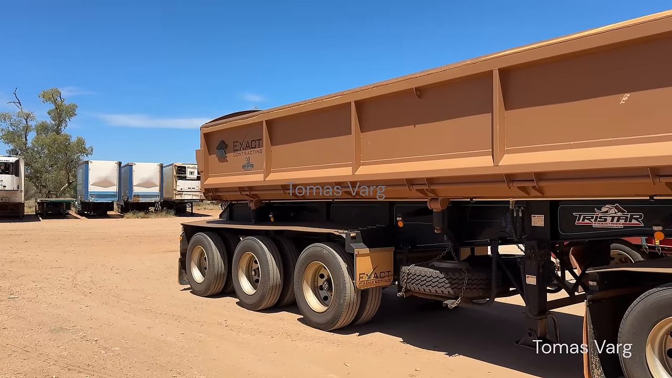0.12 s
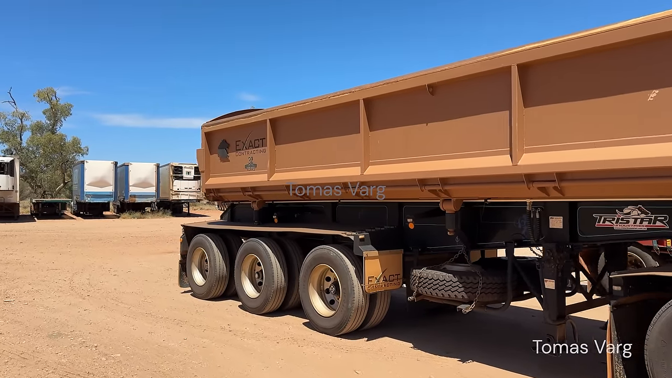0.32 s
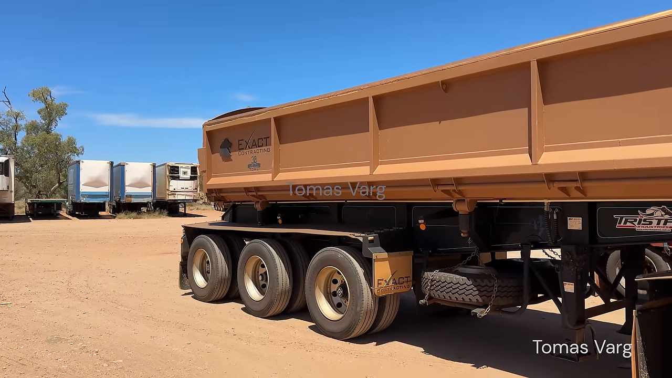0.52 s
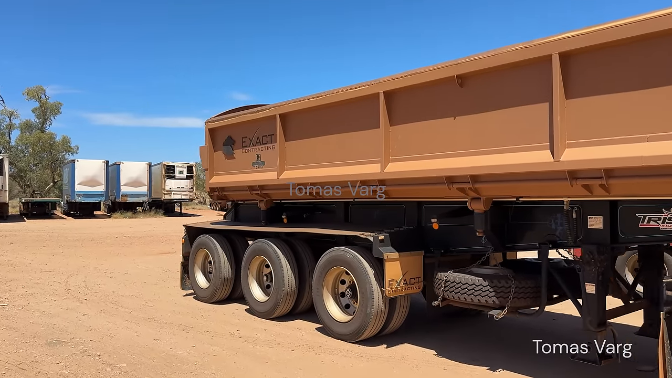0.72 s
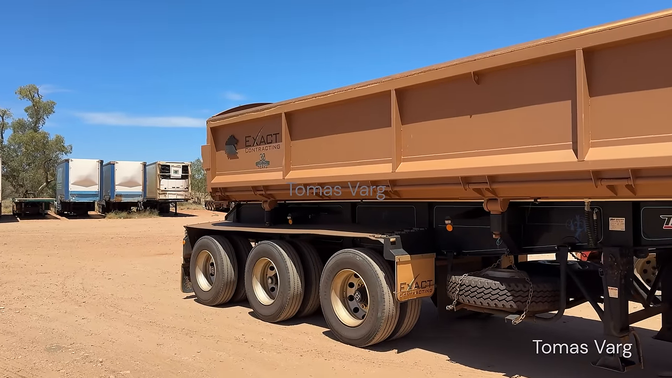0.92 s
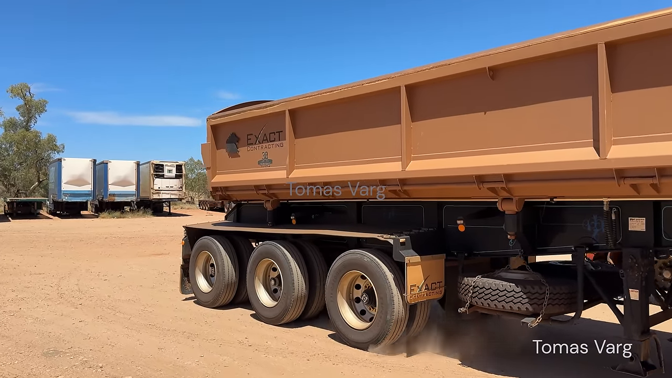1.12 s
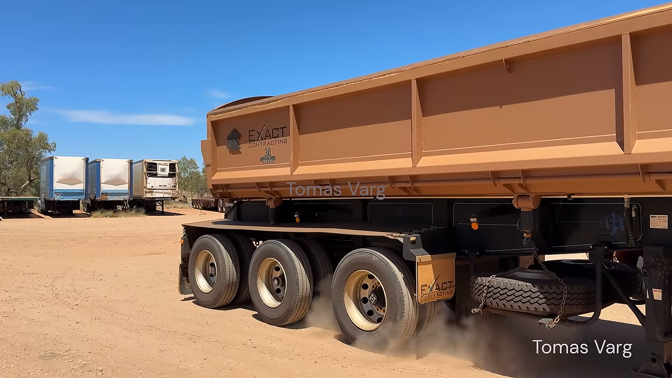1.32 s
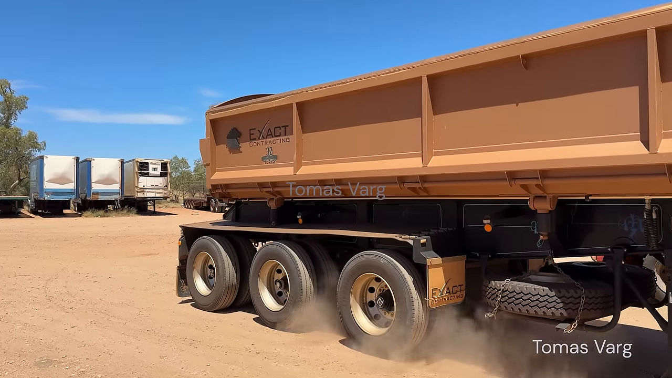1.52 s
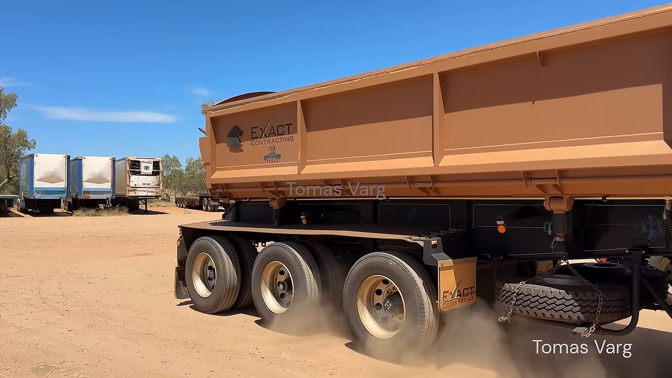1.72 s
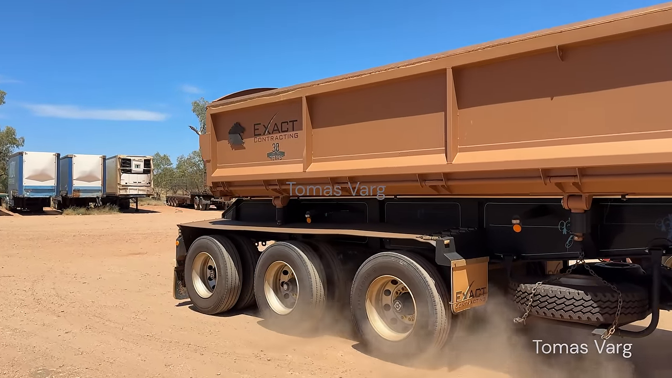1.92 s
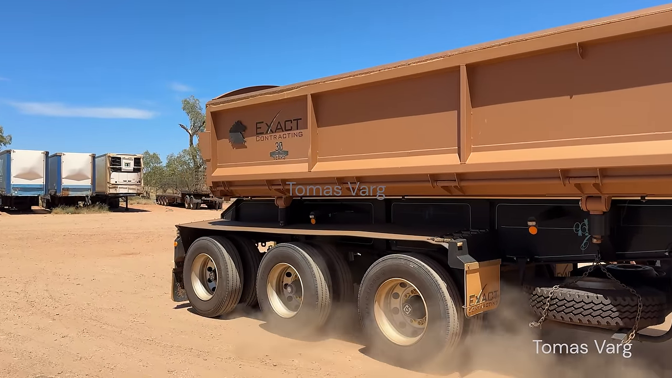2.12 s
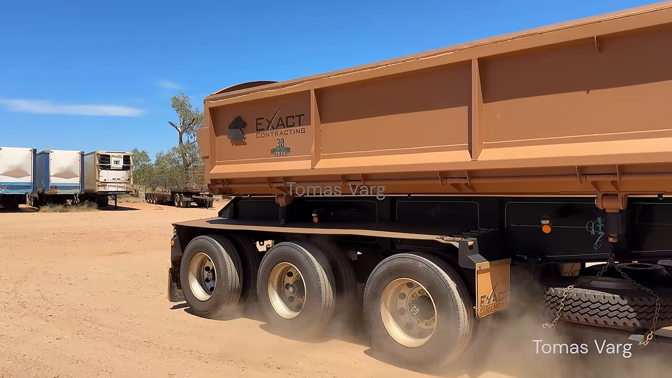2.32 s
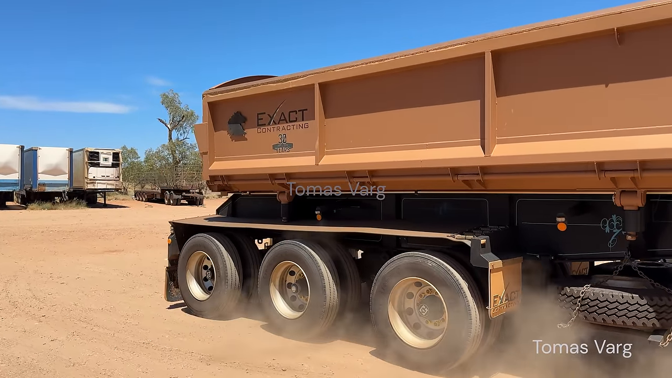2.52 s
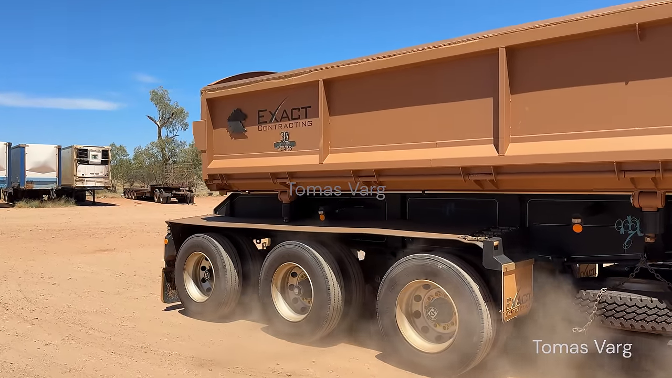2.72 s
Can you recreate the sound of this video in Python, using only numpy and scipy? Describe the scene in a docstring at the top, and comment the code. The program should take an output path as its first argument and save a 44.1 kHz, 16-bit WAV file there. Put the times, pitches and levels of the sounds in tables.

```python
"""Trailer brake-air dump

A heavy trailer in an open dirt yard dumps its brake air: filtered noise jets open in turn, dull behind wheels,
bright in plain view, sag with the pressure and snap shut. Decaying resonances jolt the chassis.
A diesel idles further off as pulses ringing its exhaust, over a yard hum of shaped noise.
Two close microphone ports hear the shared part of hiss and hum mostly late on the left."""
import sys
import numpy as np
from scipy import signal
from scipy.fft import rfft, irfft, next_fast_len
from scipy.io import wavfile
from scipy.ndimage import uniform_filter1d

SR = 44100
rng = np.random.default_rng(int(sys.argv[2]) if len(sys.argv) > 2 else 0)


def to_wav(s):
    """Save 16-bit WAV."""
    ch = np.atleast_2d(s).T  # columns
    pcm = np.round(np.clip(ch, -1, 1) * 32767)  # PCM
    wavfile.write(sys.argv[1], SR, pcm.astype(np.int16))


N = 121275

# yard hum spectrum: (frequency [Hz], relative density [dB per Hz])
HUM_SPECTRUM = [(30, -19), (90, 6), (140, -6.5), (190, -15), (700, -20), (1200, -22), (2000, -40),
                (6000, -46.5), (10000, -68), (16000, -79)]
# yard hum level: (time [s], level [dB])
HUM_LEVEL = [(0, -40), (.15, -38.5), (.3, -44), (2.5, -49.5), (2.75, -51)]

# idling engine level: (time [s], level [dB])
ENGINE_LEVEL = [(0, -41.5), (.1, -32), (.2, -33.5), (.3, -31), (.45, -34.5), (.5, -31), (.57, -30.5),
                (.64, -33.5), (.74, -42.5), (.8, -36.5), (1.2, -51.5), (1.7, -56.5), (2.3, -48),
                (2.75, -44)]
# exhaust pipe resonances: (frequency [Hz], width [Hz], relative level [dB])
EXHAUST_MODES = [(60, 48, 1.5), (102, 33, -14.5), (125.7, 64, -8.5)]
FIRING_HZ, JITTER_PERIODS = 60.5, .05
UNEVEN_DB, SURGE_DB, SURGE_RATE_HZ = 2.0, 1.2, 11

# dull returns from vehicles nearby
YARD_DB, YARD_T60_S, YARD_LOW_HZ, YARD_HIGH_HZ = -21, 0.58, 250, 2350

# chassis jolts as brake chambers let go: (time [s], strike level [dB], pitch [Hz], T60 [s])
JOLTS = [(.162, -22, 75, .1), (.4705, -9, 80, .08), (.512, -18, 95, .15), (.6915, -15, 80, .09),
         (.843, -19, 110, .15)]

# valve releases: (place, open [s], rise time constant [s], shut [s], level [dB], sag [dB/s])
VALVE_RELEASES = [("hidden", -0.11, .01, 1, -36.5, 0.54), ("hidden", 0.161, 0.013, 1.2, -28.5, 5.1),
                  ("hidden", .469, 0.011, 1.17, -20.5, 4.7), ("open", .687, 0.0018, 2.4955, -16, 3.58),
                  ("hollow", .687, 0.0043, 2.195, -14, 7.74), ("wheel", .69, .12, 1.19, -23, 4.0),
                  ("wheel", .858, 0.019, 1.203, -18.5, 1.7)]
# hearing from each place, by name:
# (frequency [Hz], relative density [dB per Hz], left minus right [dB], likeness [0-1], left lag [half turns])
PLACE_HEARING = { "hidden": [(60.2, -4.5, 0.5, 1, .01), (298, -11, 0, 0.72, 0.42),
                 (800, -10.5, -6, 0.05, 0.71), (1690, -3, -.5, 0.92, 1.0), (2760, -7.5, -2.5, 0.13, 1.32),
                 (3800, -4, 5.5, 0.6, 2), (5420, -4.5, 1, 0.52, 3.09), (6480, -6.5, 4.5, 1, 3.72),
                 (7010, -10, 7.5, 1, 3.7), (8500, -15, -3.5, 0.5, 4.85), (9600, -20, -2, 1, 5.0),
                 (12440, -24.5, 1, 0.75, 7.0), (15600, -26, 2, 1, 11)], "wheel": [(60, -11, -1.5, 1, .01),
                 (380, -11.5, 1, 1, 0.22), (855, -3, 3.5, 0.7, 0.21), (1690, 0, 1.5, 0.57, 1.1),
                 (2115, -2.5, 3, 0.3, 1.43), (2600, -1.5, 0, 0.02, 2.6), (4700, -4, 1.5, 0.6, 1.79),
                 (5360, -7.5, 7, 0, 3.3), (7060, -7, -1, 0.5, 2.1), (9200, -8.5, 1, 0.8, 12),
                 (12700, -13, 1.5, .95, 7.9), (15700, -19.5, 1.5, .95, 9.0)],
                 "hollow": [(60, -12.5, 3, 1, .01), (398, -13.5, 0, 1, 0.15), (765, -0.5, -4, 0.87, 0.47),
                 (1166, -1.7, -1.5, 0.89, 0.9), (1550, 0, .1, .95, 0.9), (1750, -1, .1, .99, 1.0),
                 (1900, -3, .1, .95, 1.07), (2100, -9, -8.5, 0.1, 3.2), (2900, -4.5, 4, 0, 2.2),
                 (4200, -6, 0.5, 0.46, 2.2), (5300, -8.5, 6, 0.7, 1.4), (7700, -11, 2.5, 0.2, 2),
                 (7820, -4, 2, 1, 1.7), (9400, -7.5, -1.5, 1, 3.2), (13200, -11, 1, 1, 5.6),
                 (15800, -9, -3, 0.94, 4.9)], "open": [(60, -15, -3.5, 1, .01), (303, -11, 0, 0.89, .01),
                 (620, -5.5, 1, 0.78, .01), (1110, -4, 1.5, 0.78, .01), (1500, -8, 1, .6, .6),
                 (1750, -11, .1, .7, 1.0), (1950, -11, .1, .5, 1.1), (2210, -10.5, 1, .5, .01),
                 (2700, -7.5, 0, 0.6, .01), (3190, -7.5, 2.5, 0.02, .01), (4200, -6.5, 1.5, 0.43, .01),
                 (6660, -4, -0.5, 0.3, .01), (9340, -5, 2, 0.8, .01), (9230, 0, -0.5, 1, 1.45),
                 (13000, -4, 0.5, 0.8, 3.3), (16400, -5.5, -1.5, 1, 5.0)]}
# left lag shared by all places above the first row: (frequency [Hz], lag [half turns])
TOP_OCTAVE_LAG = [(9550, 1), (11150, 2), (12700, 3), (14200, 4), (15600, 5)]
# undercarriage cavities colouring every jet: (frequency [Hz], width [Hz], lift [dB])
CAVITY_MODES = [(118, 30, 9.5), (208, 21, 8), (798, 68, -6), (1065, 360, 1), (2890, 66, 3),
                (3550, 220, 0.5), (4520, 240, -0.5), (8320, 440, 2)]

SPIT_DB, SPIT_S = 5.5, 0.016  # brief overshoot as a valve pops
EMPTYING_DB_PER_S2 = 0.93  # the sag steepens as a tank empties
FLUTTER_DB, FLUTTER_RATE_HZ = .5, 16  # unsteady flow
SHUT_DB_PER_S = 262
TREBLE_EXTRA_SHUT_DB_PER_S, TREBLE_HZ = 251.5, 3000
BASS_LINGER_DB_PER_S, BASS_LINGER_S, BASS_HZ = 275, 0.045, 750  # offsets the shutting fall
BOUNCE_DB, BOUNCE_MAX_S = -16.5, .02  # level of each bounce off wheels and frame
CAVITY_WANDER, WANDER_RATE_HZ = 0.011, 3.0  # spread as a share of cavity pitch
PATCH_DB, PATCH_BINS, PATCH_FRAMES = 1.5, 12, 3  # turbulent patches, about 250 Hz by 70 ms
FRAME, HOP = 2048, 1024  # samples

CUTOFF_HZ = 16000


def amp(db):
    """dB to gain."""
    return 10 ** (np.asarray(db) / 20)


def rms_one(x):
    """Scale to rms 1."""
    return x / np.sqrt(np.mean(x ** 2) + 1e-20)


def at_hz(rows, hz, column=1):
    """Read a table column on a log-frequency axis."""
    rows = np.array(rows)
    return np.interp(np.log(hz + 1), np.log(rows[:, 0]), rows[:, column])


def drift(rate_hz):
    """Slow random drift of spread 1: low-passed noise at 1/40 of the sample rate, interpolated."""
    step = 40
    r = np.exp(-2 * np.pi * rate_hz * step / SR)
    noise = rng.standard_normal(N // step + 2002)
    slow = signal.lfilter([1], [1, -2 * r, r * r], noise)[2000:]  # drop the settling
    return np.interp(np.arange(N) / step, np.arange(len(slow)), rms_one(slow))


def resonate(x, hz, width_hz):
    """Two-pole resonance; a unit click rings with height about 1."""
    r = np.exp(-np.pi * width_hz / SR)
    w = 2 * np.pi * hz / SR
    return signal.lfilter([0, np.sin(w)], [1, -2 * r * np.cos(w), r * r], x + 1e-18)  # no denormals


def port_noise(place, colour_db):
    """Noise at two ports: a shared part, lagged on the left, plus a part of each port's own."""
    size = next_fast_len(N)
    hz = np.fft.rfftfreq(size, 1 / SR)
    shared, left, right = rfft(rng.standard_normal((3, size)))

    place_hz, _, _, _, place_lag = np.transpose(place)
    lag = np.interp(hz, place_hz, place_lag)
    top_lag = np.interp(hz, *np.transpose(TOP_OCTAVE_LAG))
    late = np.exp(-1j * np.pi * np.where(hz > TOP_OCTAVE_LAG[0][0], top_lag, lag))

    alike = np.clip(at_hz(place, hz, column=3), 0, 1)
    common = np.sqrt(alike) * shared * np.array([late, np.ones_like(late)])
    own = np.sqrt(1 - alike) * np.array([left, right])

    lean = amp(at_hz(place, hz, column=2) / 2)
    delays_s = BOUNCE_MAX_S * rng.random(size=6)
    bounces = 1 + amp(BOUNCE_DB) * sum(np.exp(-2j * np.pi * hz * delay_s) for delay_s in delays_s)
    spectrum = (common + own) * bounces * amp(colour_db(hz)) * [lean, 1 / lean]
    return rms_one(irfft(spectrum, size)[:, :N])


def yard_hum():
    """Steady noise shaped to the yard's spectrum, its level following a curve."""
    hum = port_noise(PLACE_HEARING["hollow"], lambda hz: at_hz(HUM_SPECTRUM, hz))
    level_db = np.interp(np.arange(N) / SR, *np.transpose(HUM_LEVEL))
    return amp(level_db) * hum


def engine():
    """Firing pulses, uneven in time and strength, ring the exhaust resonances."""
    draws = rng.standard_normal((int(N / SR * 70), 2))
    periods = np.arange(len(draws)) + 1 + JITTER_PERIODS * draws[:, 0]
    pulses = np.zeros(2 * N)
    pulses[(periods * SR / FIRING_HZ).astype(int)] = amp(UNEVEN_DB * draws[:, 1])

    rumble = np.zeros(N)
    for hz, width_hz, db in EXHAUST_MODES:
        ring = resonate(resonate(pulses[:N], hz, width_hz), hz, width_hz)
        rumble += amp(db) * width_hz * ring  # width offsets the double resonance's gain

    level_db = np.interp(np.arange(N) / SR, *np.transpose(ENGINE_LEVEL))
    level_db = level_db + SURGE_DB * drift(SURGE_RATE_HZ)
    return rms_one(rumble) * amp(level_db) * amp([[.6], [-.6]])  # leans left


def yard_returns(x):
    """Scattered returns: convolution with band-limited, decaying noise."""
    t = np.arange(int(.6 * SR)) / SR
    tail = rng.standard_normal((2, len(t))) * amp(-60 * t / YARD_T60_S) * (t > .02)
    band = signal.butter(2, [YARD_LOW_HZ, YARD_HIGH_HZ], "band", fs=SR, output="sos")
    tail = rms_one(signal.sosfilt(band, tail)) / np.sqrt(len(t))
    return amp(YARD_DB) * signal.fftconvolve(x, tail, axes=1)[:, :N]


def chassis_jolts():
    """Softened knocks, each ringing one decaying resonance."""
    out = np.zeros(N)
    for time_s, level_db, hz, t60_s in JOLTS:
        knock = -amp(level_db) * (np.arange(N) == int(time_s * SR))
        soft = signal.lfilter([.02], [1, -.98], knock + 1e-18)
        out += resonate(soft, hz, np.log(1000) / (np.pi * t60_s))
    return out


def turbulent_colour():
    """Gain over frequency and time: cavities wander with the flow, turbulent patches pass."""
    hz = np.fft.rfftfreq(FRAME, 1 / SR)[:, None]
    frames = -(-N // HOP) + 1
    at = np.minimum(np.arange(frames) * HOP, N - 1)

    lift_db = 0
    for mode_hz, width_hz, db in CAVITY_MODES:
        centre_hz = mode_hz * (1 + CAVITY_WANDER * drift(WANDER_RATE_HZ)[at])
        lift_db = lift_db + db / (1 + (2 * (hz - centre_hz) / width_hz) ** 2)

    patches = uniform_filter1d(rng.standard_normal(lift_db.shape), size=PATCH_BINS, axis=0)
    patches = uniform_filter1d(patches, size=PATCH_FRAMES, axis=1)
    return amp(lift_db + PATCH_DB * rms_one(patches))


def shut_tone(jet, since_shut_s):
    """Closing valve's tone: treble falls faster, bass lingers briefly."""
    body = signal.sosfilt(signal.butter(1, TREBLE_HZ, fs=SR, output="sos"), jet)
    treble = jet - body
    jet = body + treble * amp(-TREBLE_EXTRA_SHUT_DB_PER_S * np.maximum(since_shut_s, 0))
    bass = signal.sosfilt(signal.butter(2, BASS_HZ, fs=SR, output="sos"), jet)
    linger_db = BASS_LINGER_DB_PER_S * np.clip(since_shut_s, 0, BASS_LINGER_S)
    return jet + bass * (amp(linger_db) - 1)


def air_releases():
    """Turbulent jets: each valve pops open, hisses while pressure sags, and shuts."""
    t = np.arange(N) / SR
    out = np.zeros((2, N))
    colour = turbulent_colour()  # shared by all jets
    for place, open_s, rise_s, shut_s, level_db, sag_db_per_s in VALVE_RELEASES:
        hearing = PLACE_HEARING[place]
        age_s = np.maximum(t - open_s, 0)
        flow_db = level_db - sag_db_per_s * age_s - EMPTYING_DB_PER_S2 * age_s ** 2
        flow_db += SPIT_DB * np.exp(-age_s / SPIT_S)
        flow_db -= SHUT_DB_PER_S * np.maximum(t - shut_s, 0)
        flow_db += FLUTTER_DB * drift(FLUTTER_RATE_HZ)

        jet = port_noise(hearing, lambda hz: at_hz(hearing, hz))
        spectra = signal.stft(jet, nperseg=FRAME)[2]
        jet = rms_one(signal.istft(spectra * colour, nperseg=FRAME)[1][:, :N])
        jet = shut_tone(jet, t - shut_s)
        out += jet * amp(flow_db) * (1 - np.exp(-age_s / rise_s))
    return out


def scene():
    """Hum, engine, jolts, air and the air's yard returns."""
    air = air_releases()
    return yard_hum() + engine() + yard_returns(air) + chassis_jolts() + air


def record(dry):
    """Cut the lowest bass, round the peaks, cut the top."""
    dry = signal.sosfilt(signal.butter(3, 42, "high", fs=SR, output="sos"), dry)
    rounded = 1.1 * np.tanh(dry / 1.1)
    return signal.sosfilt(signal.ellip(14, .5, 95, CUTOFF_HZ, fs=SR, output="sos"), rounded)


dry = scene()
out = record(dry)
to_wav(out)
```